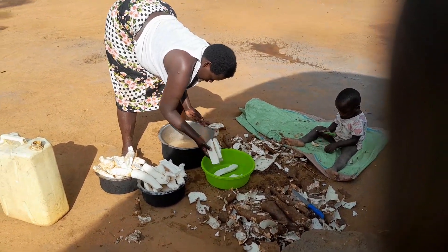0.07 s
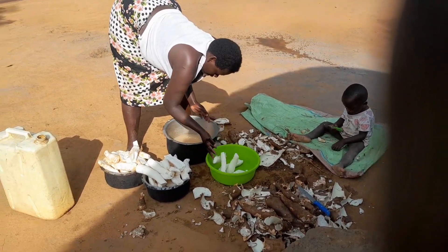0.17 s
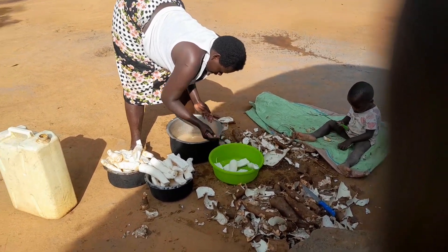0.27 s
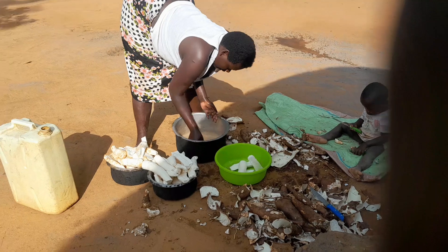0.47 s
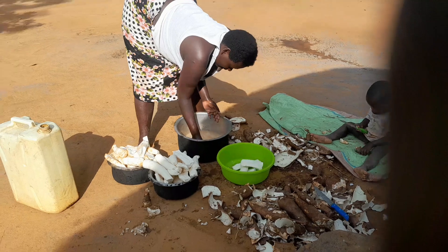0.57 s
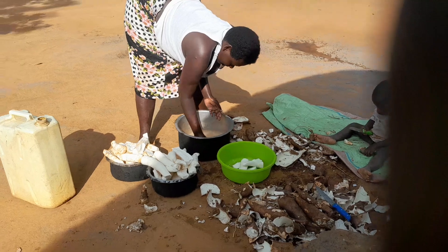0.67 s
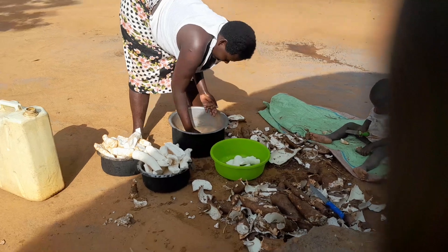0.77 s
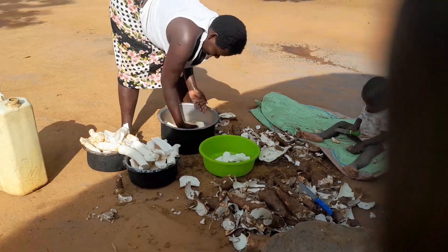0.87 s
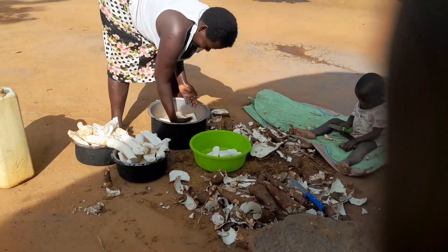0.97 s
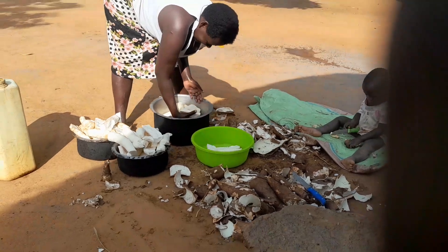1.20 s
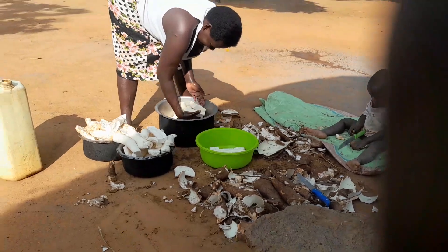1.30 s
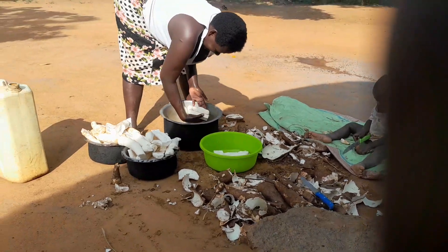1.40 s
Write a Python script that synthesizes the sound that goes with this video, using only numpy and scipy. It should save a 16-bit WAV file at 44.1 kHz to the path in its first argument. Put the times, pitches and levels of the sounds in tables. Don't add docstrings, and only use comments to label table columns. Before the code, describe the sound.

Peeled roots clatter wetly into a basin, followed by quieter hand-washing swishes, drips and dull underwater knocks

```python
import sys
import numpy as np
from scipy import signal
from scipy.fft import rfft, irfft
from scipy.io import wavfile

SR = 44100
rng = np.random.default_rng(int(sys.argv[2]) if len(sys.argv) > 2 else 0)


def dump_mix(stems):
    frames = np.atleast_2d(stems).T
    limited = np.clip(frames, -1, 1)
    pcm = np.round(limited * 32767).astype(np.int16)
    wavfile.write(sys.argv[1], SR, pcm)


def boost(x):
    u = np.asarray(x, float) / 20
    return 10 ** u


N = 63945

# frequency_hz, density_db (per Hz)
YARD_SPECTRUM = [(15, -35), (25, 18), (911, -20), (1020, -33.5), (2000, -19), (3160, -31), (6380, -4),
                 (8140, -22), (16000, -27)]
# frequency_hz, shared_part (0 to 1)
LIKENESS = [(60, 0.16), (400, 0.1), (1500, 0.66), (5000, 0.06), (12000, 0.35)]
# time_s, level_db
STIRRING = [(0, -82.5), (.2, -67.5), (.71, -63.5), (.74, -59.5), (.95, -57), (1.02, -56), (1.13, -55),
            (1.16, -63.5), (1.19, -58), (1.36, -56.5), (1.45, -61)]
# frequency_hz, density_db (per Hz)
SWISH_SPECTRUM = [(120, -42), (200, -1), (249, -16), (380, -7.5), (735, -27.5), (1770, -8), (5230, -10),
                  (9400, -27.5), (16000, -24)]
# start_s, level_db (peak), rise_s, t60_s
CRACKS = [(0.2227, -35.5, 0.0049, 0.033), (.238, -36, .003, 0.016), (0.2543, -32.5, 0.0027, 0.047),
          (.262, -27.5, 0.001, 0.011), (0.28, -40.5, 0.0015, 0.039), (.292, -46.5, 0.0021, 0.014),
          (0.3256, -25, 0.0024, 0.024), (0.329, -35, 0.003, 0.022), (.351, -40, 0.0028, 0.0352),
          (0.359, -47, 0.0058, 0.054), (.374, -43.5, 0.0037, 0.078), (0.4382, -41.5, .002, 0.031)]
# time_s, level_db
RUNOFF = [
    (.222, -77.5),
    (.228, -56),
    (.27, -49),
    (.32, -57),
    (.34, -46),
    (.39, -51),
    (.42, -55),
    (0.499, -51),
    (0.559, -88),
]
# frequency_hz, density_db (per Hz)
CRACK_SPECTRUM = [(1180, -1), (1900, 0.5), (3230, -9.5), (3910, -6), (5120, -12), (6880, -8.5), (8550, -23),
                  (13800, -22), (16000, -22.5)]
# start_s, level_db (peak), thump_hz, thump_db (over body), pitch_hz
KNOCKS = [(0.2245, -29, 160, 0, 700), (0.2275, -21.5, 147, -12.5, 1564), (0.234, -25, 99, -23, 765),
          (0.239, -23, 93, -10.5, 418), (0.2525, -27.5, 101, -20, 750), (0.258, -18.5, 171, -7, 1370),
          (0.263, -22.5, 173, -3.5, 650), (0.268, -32.5, 148, -11, 600), (0.279, -24, 90.3, -5.5, 434),
          (0.286, -44, 94, -8, 490), (0.292, -32.5, 97, 3.5, 292), (0.307, -30, 91.5, 0, 420),
          (0.3261, -18, 200, -23, 615), (0.33, -15.5, 204, -21, 1760), (0.341, -26, 94.5, -12, 600),
          (0.3522, -13.5, 93, -31, 526), (0.353, -15.5, 98.5, -24, 1335), (0.374, -21.5, 181, -8, 1396),
          (0.387, -28.5, 98, -1, 700), (0.397, -49, 91, 12, 410), (0.411, -40, 95, -0.5, 600),
          (0.43, -33.5, 140, -2, 1270), (0.437, -32, 121, -7.5, 820), (0.448, -36.5, 97, -12, 560),
          (0.474, -31.5, 92.6, -6.5, 402), (0.484, -38.5, 95, -8.5, 1430), (0.498, -48.5, 95, 3, 506),
          (0.518, -52, 93.5, 0, 389), (0.535, -45.5, 89, -1.5, 410)]
# start_s, level_db (peak), crack_db (over body)
WET_KNOCKS = [(0.677, -61, -8), (0.816, -49, -45), (0.962, -52.5, -21), (0.999, -44.5, -6),
              (1.012, -43.5, -26), (1.181, -38, -13.5), (1.185, -40.5, -14.5), (1.187, -31.5, -28),
              (1.194, -41.5, -29), (1.216, -35, -28), (1.33, -52.5, -5.5), (1.342, -45.5, -7),
              (1.353, -50, -6)]
WET_PITCHES = (282, 372, 178, 1340, 1270, 1660, 700, 1510, 420, 1190, 600, 1730, 650)
# frequency_hz, level_db, t60_s
BASIN_MODES = [(215, -13, 0.054), (282, -18, 0.051), (393.7, -1.5, 0.093), (449, -6, 0.058),
               (516, -5, 0.069), (575, -1.5, 0.031), (627, 5.5, 0.042), (758, -6, 0.052),
               (824, -12.5, 0.061), (1040, -20.5, 0.053), (1343, 6.5, 0.017), (1620, -9, 0.04),
               (1769, 6, 0.034), (2480, -5, 0.021)]
# start_s, level_db (peak), t60_s
SPLASHES = [(.531, -49, 0.014), (0.5416, -36, .014), (0.5473, -39, .015), (0.6269, -48.5, 0.03),
            (0.722, -51, 0.25), (0.8292, -44, 0.038), (0.979, -33.5, 0.047), (0.9983, -34, 0.015),
            (1.128, -47, 0.0079), (1.2446, -46, 0.046), (1.271, -43, 0.086), (1.298, -47, .03),
            (1.351, -50.5, 0.14), (1.3295, -47, 0.048)]
# frequency_hz, density_db (per Hz)
SPRAY_SPECTRUM = [(1470, -17.5), (2500, -7), (3830, -13.5), (6110, -8), (9360, -22), (13200, -22.5),
                  (16000, -7.5)]
# start_s, level_db
HEAVES = [(0.734, -56.5), (0.799, -61), (0.866, -59.5), (0.938, -61.5), (0.966, -56), (1.07, -55.5),
          (1.118, -65), (1.195, -52.5), (1.236, -57.5), (1.299, -57.5), (1.357, -61), (1.408, -56)]
WATER_MODES = (64.6, 88.2, 127, 169)
WATER_MODE_LEVELS = (-3, -1.5, -7, -16)
# start_s, level_db (peak), pitch_hz, t60_s
DRIPS = [(1.060, -46, 1000, .018), (1.120, -45, 2750, .03), (1.127, -50, 2300, .03),
         (1.128, -46, 6000, .01), (1.184, -47, 3250, .025), (1.192, -45, 1850, .025),
         (1.196, -49, 2850, .035), (1.215, -50, 3300, .035), (1.244, -49, 4200, .03),
         (1.333, -43, 1710, .011), (.786, -56, 2200, .05), (.982, -48, 3900, .035), (1.110, -56, 1130, .04),
         (1.135, -57, 1130, .025), (1.112, -53, 684, .08)]
# start_s, level_db, pitch_hz, t60_s, left_over_right_db
POP = (1.0462, -27, 1230, .010, 15)
# start_s, level_db
POT_TAPS = [
    (1.093, -45.5),
    (1.110, -87),
    (1.121, -52.5),
]
# frequency_hz, level_db, t60_s
POT_MODES = [
    (506, 0, .2),
    (300, -8, .06),
    (526, -12, 1.5),
]


def rms_one(x):
    return x / np.sqrt(np.mean(x ** 2) + 1e-20)


def in_time(rows, **ends):
    return np.interp(np.arange(N) / SR, *np.transpose(rows), **ends)


def at_hz(points, hz):
    table = np.array(points)
    return np.interp(np.log(hz), np.log(table[:, 0]), table[:, 1])


def leftward(db):
    return boost(np.array([[db / 2], [-db / 2]]))


def drift(rate_hz):
    pole = np.exp(-80 * np.pi * rate_hz / SR)
    chance = rng.standard_normal(N // 40 + 2002)
    slow = signal.lfilter([1], [1, -2 * pole, pole * pole], chance)[2000:]
    return np.interp(np.arange(N) / 40, np.arange(len(slow)), rms_one(slow))


def ring(clicks, hz, t60_s):
    radius = boost(-60 / (t60_s * SR))
    angle = 2 * np.pi * hz / SR
    return signal.lfilter([0, np.sin(angle)], [1, -2 * radius * np.cos(angle), radius ** 2], clicks + 1e-18)


def fade(start_s, db, t60_s, rise_s=0.00067):
    t = np.maximum(np.arange(N) / SR - start_s, 0)
    decay = boost(db - 60 * np.maximum(t - rise_s, 0) / max(t60_s, .003))
    return decay * np.minimum(t / max(rise_s, .0005), 1)


def noise(spectrum, patchy_db):
    out, together = 0, drift(6)
    edges = 24 * 2 ** np.arange(0, 9.6, .5)
    bins = np.maximum(np.arange(N // 2 + 1) * SR / N, 1)
    slope = np.clip(np.log2(bins / spectrum[0][0]), -4, 0) * 18
    colour = boost(at_hz(spectrum, bins) + slope)
    coloured = irfft(rfft(rng.standard_normal((2, 2, N))) * colour, N)
    for k, (low, high) in enumerate(zip(edges, edges[1:])):
        band = signal.butter(2, [low, high], "band", fs=SR, output="sos")
        mid, side = signal.sosfilt(band, coloured[k % 2])
        alike = np.clip(at_hz(LIKENESS, np.sqrt(low * high)), 0, 1)
        gain = boost(patchy_db * (together + drift(28)))
        out = out + gain * (np.sqrt(1 + alike) * mid + np.sqrt(1 - alike) * side * [[1], [-1]])
    return rms_one(out)


def yard():
    return boost(-62.5) * noise(YARD_SPECTRUM, patchy_db=1.5)


def swish():
    bubbles_per_s, fizz_db = 250, -5.5
    sizes = boost(4.0 * np.minimum(rng.exponential(1, N), 4)) * rng.choice([-1, 1], N)
    sizes = sizes * (rng.random(N) < bubbles_per_s / SR)
    dealt = rng.integers(0, 20, N)
    pitches_hz = np.geomspace(1500, 7000, 20)
    fizz = rms_one(sum(ring(sizes * (dealt == k), hz, 42.0 / hz) for k, hz in enumerate(pitches_hz)))
    return boost(in_time(STIRRING)) * (noise(SWISH_SPECTRUM, patchy_db=-1.0) + boost(fizz_db) * fizz)


def cracks():
    power = sum(fade(s, db, t60_s, rise_s) ** 2 for s, db, rise_s, t60_s in CRACKS)
    power = power + boost(in_time(RUNOFF, right=-120)) ** 2
    under = sum(fade(s, db + crack_db + 2.0, 0.08) ** 2 for s, db, crack_db in WET_KNOCKS)
    return np.sqrt(power * leftward(4) ** 2 + under) * noise(CRACK_SPECTRUM, patchy_db=1.5)


def struck_body(pitch_hz, share, span):
    contact_cut_hz, touches_s = 2850, .002
    pitch_lift_db, pitch_width_oct = 11.5, 0.68
    root_db, root_cycles = 16.5, 28
    half_cycle = SR / pitch_hz / 2
    touch = np.zeros(span)
    third = int(half_cycle + 2 + rng.random() * touches_s * SR)
    touch[[0, int(half_cycle), third]] = .45, -1, .3
    touch = signal.sosfilt(signal.butter(2, contact_cut_hz, fs=SR, output="sos"), touch)
    hit = boost(root_db) * ring(touch, pitch_hz, share * root_cycles / pitch_hz)
    for hz, level_db, t60_s in BASIN_MODES:
        lift_db = pitch_lift_db * np.exp(-(np.log2(hz / pitch_hz) / pitch_width_oct) ** 2)
        scatter_db = 2 * (7.6 * rng.random() - 2)
        wander = 1 + .04 * (rng.random() - .5)
        hit = hit + boost(level_db + lift_db + scatter_db) * ring(touch, hz * wander, share * t60_s)
    return hit / np.abs(hit).max()


def thump(hz, span):
    push = np.zeros(span)
    push[:120] = np.diff(np.hanning(121)) * rng.choice([-1, 1])
    low = ring(push, hz, 0.08 * 95 / hz)
    return low / np.abs(low).max()


def rolling():
    grit = rng.standard_normal(N) * (rng.random(N) < 900 / SR)
    out = 0
    for hz, level_db, t60_s in BASIN_MODES:
        tilt_db = -8.3 * np.log2(hz / 400)
        out = out + boost(level_db + tilt_db) * ring(grit * rng.random(N), hz, .5 * t60_s)
    return rms_one(out)


def knocks():
    thump_db, rumble_db, rumble_t60_s = -2.5, -18, 0.22
    span = 9000
    body, roll = np.zeros(N + span), 0
    rows = [(*row, 1) for row in KNOCKS]
    rows += [(s, db, 95, -24, hz, 0.75) for (s, db, _), hz in zip(WET_KNOCKS, WET_PITCHES)]
    for s, db, low_hz, low_db, pitch_hz, share in rows:
        hit = struck_body(pitch_hz, share, span) + boost(low_db + thump_db) * thump(low_hz, span)
        i = int(s * SR)
        body[i:i + span] += boost(db) * hit
        roll = roll + fade(s, db + rumble_db, share * rumble_t60_s) ** 2
    return body[:N] + np.sqrt(roll) * rolling()


def echoes(x):
    echo_db, echo_t60_s = -18, .12
    t = np.arange(6000) / SR
    tail = rng.standard_normal((2, 6000)) * (rng.random((2, 6000)) < .03)
    tail = tail * boost(-60 * t / echo_t60_s) * (t > .002)
    tail = signal.sosfilt(signal.butter(1, [250, 3000], "band", fs=SR, output="sos"), tail)
    tail = tail / np.sqrt((tail ** 2).sum(1, keepdims=True))
    return boost(echo_db) * signal.fftconvolve(x[None], tail, axes=1)[:, :N]


def splashes():
    flare = sum(fade(s, db - 4.5, t60_s) for s, db, t60_s in SPLASHES)
    return flare * noise(SPRAY_SPECTRUM, patchy_db=1.5)


def slosh():
    out, uneven_db = 0, rng.normal(0, 2.95, (len(HEAVES), 4))
    for k, (hz, level_db) in enumerate(zip(WATER_MODES, WATER_MODE_LEVELS)):
        pushes = np.zeros(N)
        for (s, db), chance_db in zip(HEAVES, uneven_db):
            i = int(s * SR)
            pushes[i:i + 200] = boost(db + level_db + chance_db[k]) * np.diff(np.hanning(201))
        out = out + ring(pushes, hz, 0.27) * 90 / hz
    return boost(2.0) * out


def drips():
    out = 0
    for s, db, hz, t60_s in DRIPS:
        t = np.maximum(np.arange(N) / SR - s, 0)
        bent = t + .05 * t * np.minimum(t / t60_s, 1)
        out = out + fade(s, db + 4.5, t60_s) * np.sin(2 * np.pi * hz * bent)
    return out * boost(np.array([[4], [-8]]))


def pop():
    s, db, hz, t60_s, left_db = POP
    click = np.zeros(N)
    i = int(s * SR)
    click[i], click[i + 6] = -boost(db), boost(db)
    tone = ring(click, hz, t60_s) + boost(-10) * ring(click, 2900, .003)
    return signal.lfilter([.4], [1, -.6], tone) * leftward(left_db)


def pot():
    taps = np.zeros(N)
    for s, db in POT_TAPS:
        i = int(s * SR)
        taps[i:i + 20] = boost(db) * np.hanning(20) / 10
    return sum(boost(db) * ring(taps, hz, t60_s) for hz, db, t60_s in POT_MODES)


def scene():
    hard = knocks() + pot()
    water = swish() + splashes() + slosh() + drips()
    return yard() + water + cracks() + hard * leftward(1) + echoes(hard) + pop()


def top_cut(x):
    return signal.sosfilt(signal.butter(12, 16510, fs=SR, output="sos"), x)


def record(dry):
    lag_samples, lift_db, lift_hz = 7, 2.5, 1830
    right = np.interp(np.arange(N) - lag_samples, np.arange(N), dry[1])
    both = np.array([dry[0], right])
    bright = signal.sosfilt(signal.butter(1, lift_hz, "high", fs=SR, output="sos"), both)
    both = both + (leftward(lift_db) - 1) * bright
    both = signal.sosfilt(signal.butter(2, 55, "high", fs=SR, output="sos"), both)
    mix = signal.sosfilt(signal.cheby2(12, 35, 15900, fs=SR, output="sos"), both)
    return top_cut(mix)


dry = scene()
out = record(dry)
dump_mix(out)
```